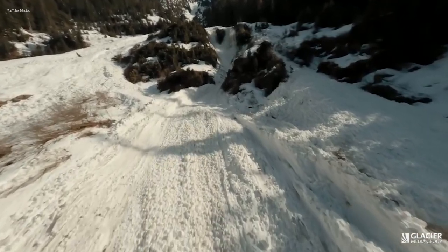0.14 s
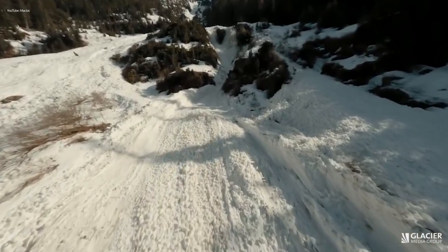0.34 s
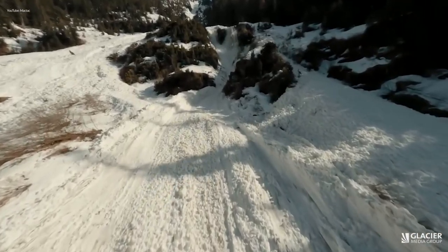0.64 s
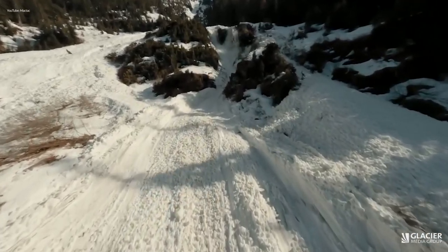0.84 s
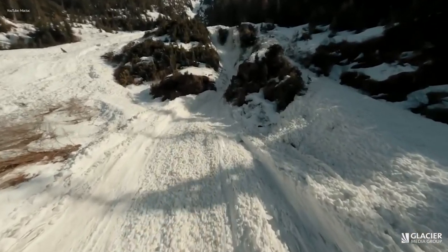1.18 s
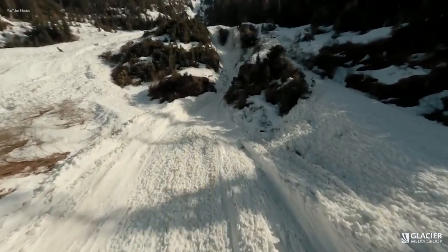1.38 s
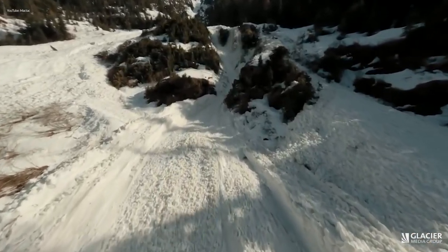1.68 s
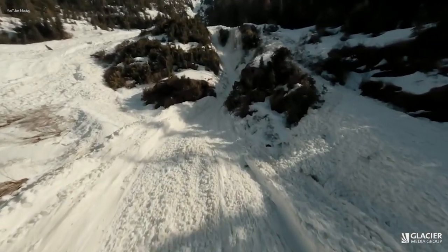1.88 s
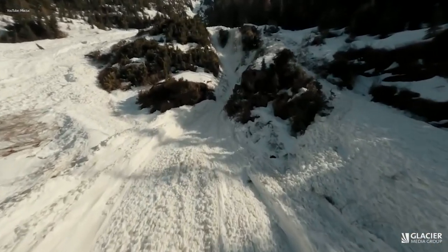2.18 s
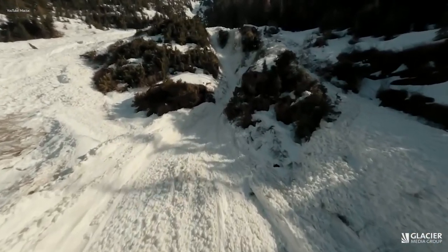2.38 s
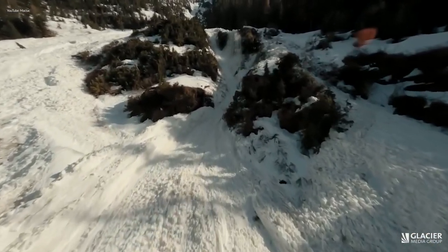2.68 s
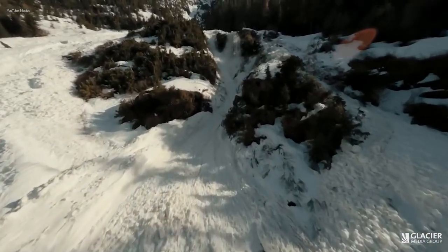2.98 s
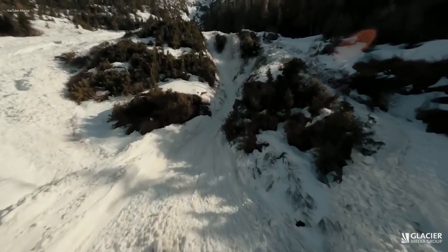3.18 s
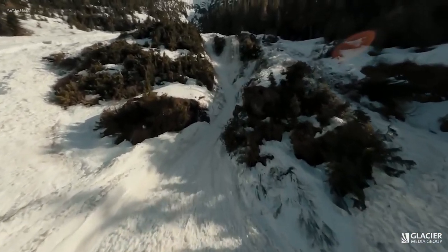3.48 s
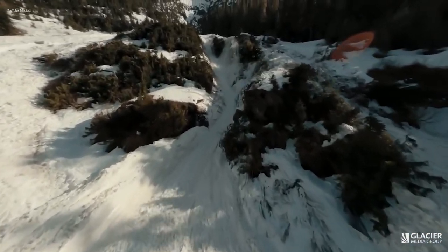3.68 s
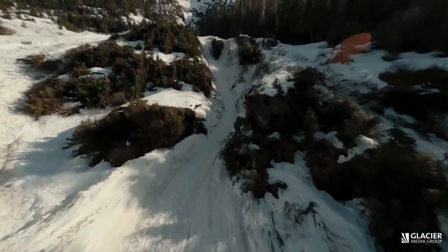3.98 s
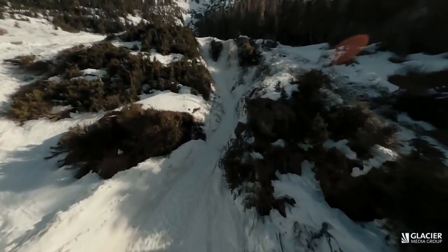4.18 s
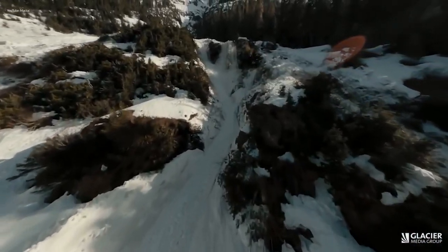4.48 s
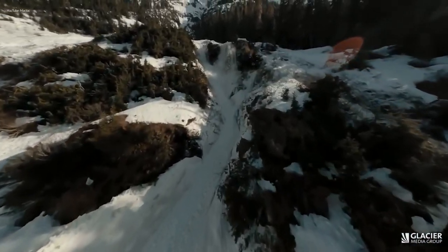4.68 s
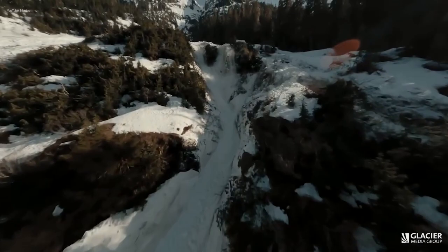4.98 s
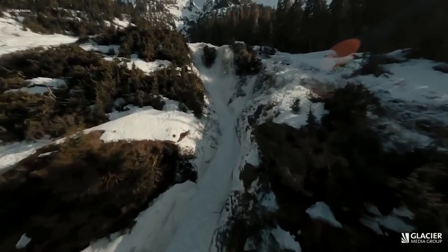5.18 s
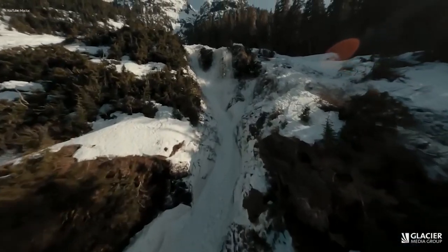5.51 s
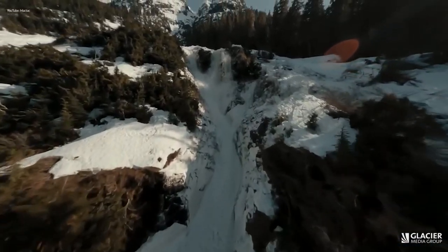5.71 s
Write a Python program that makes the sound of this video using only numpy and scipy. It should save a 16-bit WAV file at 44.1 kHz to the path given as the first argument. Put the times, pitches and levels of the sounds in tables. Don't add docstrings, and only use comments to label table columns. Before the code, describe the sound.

Heavy sub-bass roar of sliding snow heaves and throbs close by, lumps crackling within it, thinning and widening toward the end.

```python
import sys
import numpy as np
from scipy import signal
from scipy.fft import rfft, irfft
from scipy.io import wavfile
from scipy.ndimage import uniform_filter1d, minimum_filter1d

SR = 44100
rng = np.random.default_rng(int(sys.argv[2]) if len(sys.argv) > 2 else 0)


def materialize(psi):
    bounded = np.clip(np.atleast_2d(psi).T, -1, 1)
    quanta = np.round(bounded * 32767).astype(np.int16)
    wavfile.write(sys.argv[1], SR, quanta)


def decibels_to_gain(level_db):
    exponent = np.asarray(level_db, float) / 20
    return 10 ** exponent


N = 257984


def evened(x):
    return x / np.sqrt(np.mean(x ** 2) + 1e-20)


def curves(rows):
    s, *columns = np.transpose(rows)
    return [np.interp(np.arange(N) / SR, s, c) for c in columns]


def read(points, hz):
    f, value = np.transpose(points)
    return np.interp(np.log(hz + 1), np.log(f + 1), value, right=value[-1])


def colour(x, points):
    hz = np.fft.rfftfreq(x.shape[-1], 1 / SR)
    inside = (hz > points[0][0]) & (hz < points[-1][0])
    return irfft(rfft(x) * decibels_to_gain(read(points, hz)) * inside, x.shape[-1])


def lean(db):
    pair = np.array([decibels_to_gain(db / 2), decibels_to_gain(-db / 2)])
    return pair / pair.mean(0)


def drift(seconds):
    size = max(int(seconds * SR), 2)
    return evened(uniform_filter1d(uniform_filter1d(rng.standard_normal(N), size), size))


def patches(shape, bins, frames):
    across = uniform_filter1d(rng.standard_normal(shape), int(bins), 0)
    return evened(uniform_filter1d(across, int(frames), 1))


def swells(rows):
    middle, length = np.transpose(rows)[:2, :, None]
    t = np.arange(0, N + 64, 64) / SR
    return np.cos(np.pi * np.clip((t - middle) / length, -.5, .5)) ** 2


def summed(heights, shapes):
    return np.interp(np.arange(N) / 64, np.arange(shapes.shape[1]), heights @ shapes)


def steadied(x, seconds, share):
    power = uniform_filter1d((x ** 2).mean(0), int(seconds * SR))
    return x / (abs(power) + 1e-9) ** (np.clip(share, 0, 1) / 2)


def grains(per_s, spread_db, hz_low, hz_high, cycles, count):
    size = decibels_to_gain(spread_db * np.minimum(rng.exponential(1, N), 5)) * rng.choice([-1, 1], N)
    size = size * (rng.random(N) < per_s / SR)
    kind = rng.integers(0, count, N)
    t = np.arange(600) / SR
    out = np.zeros(N)
    for k, hz in enumerate(np.geomspace(hz_low, hz_high, count)):
        ring = np.sin(2 * np.pi * hz * t) * np.exp(-hz * t / cycles) * hz
        out += signal.oaconvolve(size * (kind == k), ring)[:N]
    return evened(out)


# time_s, weight_db, front_side_db
MASS_WEIGHT = [
    (0, -1.5, 4.5),
    (.7, -0.5, 1.5),
    (1.2, -0.5, -3),
    (2.0, 0.5, 0),
    (2.6, -1.5, -2),
    (3.4, -0.5, -2),
    (4.2, -1.5, -1.5),
    (4.8, -4.5, 1),
    (5.3, -5.5, 4.5),
    (5.85, -7.5, 10.5),
]
# centre_hz, level_db, weight_share
GROUND_DEPTHS = [
    (15.7, -20, 1.35),
    (52, -18.5, 1.08),
    (136, -27.5, 0.97),
]
# middle_s, length_s, change_db, depth_hz
MASS_HEAVES = [(0.112, 0.093, 8.5, 76), (0.16, 0.41, 8, 14), (0.271, 0.099, -14, 9.1),
               (0.47, 0.13, -12.5, 14), (0.704, 0.63, 12, 29.4), (1.204, 0.22, -6.5, 36),
               (1.319, 0.053, 7, 15), (1.455, .14, 8, 34), (1.774, 0.28, 6.5, 28), (1.882, 0.026, 18.5, 15),
               (1.925, 0.16, -9.5, 30), (2.065, 0.14, -31, 22.4), (2.163, 0.036, 2.5, 110),
               (2.354, 0.084, 28, 26.4), (2.475, 0.43, -6.5, 34), (2.693, 0.11, -4.5, 9.5),
               (2.942, .1, -3.5, 7.7), (3.472, 0.36, 7, 17), (3.556, 0.1, -34, 35), (3.719, 0.053, 13, 13),
               (3.772, 0.28, -8.5, 28), (4.092, 0.23, -12, 49), (4.204, 0.17, -0.5, 27),
               (4.31, 0.11, -14.5, 7.5), (4.498, 0.1, 2, 15), (4.7, 0.3, 10, 14), (5.061, 0.93, 8.5, 12.8),
               (5.231, 0.13, -40.5, 20), (5.577, 0.26, 19, 29.2), (0.275, 0.34, 6.5, 103),
               (0.126, 0.23, -1, 170), (0.604, 0.3, -2.5, 140), (1.04, 0.072, 3, 120),
               (1.318, 0.16, 1.5, 140), (1.543, 0.13, -2.5, 73), (1.707, 0.34, 1.5, 170),
               (1.848, 0.19, -4, 170), (2.044, 0.28, 0.5, 160), (2.405, 0.11, -11, 190),
               (2.552, 0.16, 4.5, 170), (2.873, 0.47, 3.5, 110), (3.3, 0.28, 0.5, 180),
               (3.676, 0.1, 3, 170), (3.986, .2, 0.5, 160), (4.24, 0.15, 3.5, 100),
               (4.378, 0.065, -10, 280), (4.585, 0.11, -2.5, 190), (4.752, 0.13, 4, 150),
               (5.246, 0.28, 2.5, 120), (5.703, 0.16, -4.5, 160)]


def depths_db():
    weight_db = curves(MASS_WEIGHT)[0]
    shapes = swells(MASS_HEAVES)
    _, _, heave_db, heave_hz = np.transpose(MASS_HEAVES)
    reach_octaves = 0.99
    levels = []
    for centre_hz, level_db, share in GROUND_DEPTHS:
        near = np.exp(-(np.log2(heave_hz / centre_hz) / reach_octaves) ** 2)
        wander_db = 1.27 * drift(0.045)
        levels.append(level_db + share * weight_db + wander_db + summed(heave_db * near, shapes))
    return levels


# pitch_hz, level_db
SHAKE_SPECTRUM = [(4, -19.5), (9, 3), (14, -8), (22, -6.5), (28, -9.5), (36, -19.5)]
RUMBLE_SPECTRUM = [(27, -25.5), (34, 0.5), (40, -2), (47, -5), (56, -3.5), (75, -6.5), (100, -11.5),
                   (130, -27.5), (170, -33)]
TUMBLE_SPECTRUM = [(80, -7.5), (110, -0.5), (140, -3), (190, -7.5), (270, -13.5), (400, -20.5),
                   (600, -28.5), (1000, -36.5)]
# pitch_hz, left_right_correlation (1 = the same)
EAR_LIKENESS = [(10, 1), (28, 0.48), (45, 0.82), (62, 0.16), (85, 1), (140, 0.76), (270, 0.92), (600, 0.59)]


def ground():
    alike = np.clip(read(EAR_LIKENESS, np.fft.rfftfreq(N, 1 / SR)), -1, 1)
    width = decibels_to_gain(curves(MASS_WEIGHT)[1])
    bodies = (SHAKE_SPECTRUM, RUMBLE_SPECTRUM, TUMBLE_SPECTRUM)
    steady_s, steady_share, leans_db = (.16, .1, .12), (.9, .6, .4), (0, .3, -1.3)
    out = np.zeros((2, N))
    for db, body, seconds, share, lean_db in zip(depths_db(), bodies, steady_s, steady_share, leans_db):
        mid, side = rfft(rng.standard_normal((2, N)))
        side = side * np.sqrt((1 - alike) / (1 + alike))
        mid, side = colour(irfft(np.array([mid, side]), N), body)
        pair = steadied(np.array([mid + width * side, mid - width * side]), seconds, share)
        out += decibels_to_gain(db) * lean(lean_db)[:, None] * pair / np.std(pair.mean(0))
    return out


# middle_s, length_s, change_db, depth_hz
BLOCK_ROLLS = [(0.373, 0.25, 6.5, 72), (1.252, 0.18, -1, 72), (1.397, 0.2, -5, 72), (2.35, 0.12, 3, 72),
               (2.559, 0.15, 10.5, 72), (2.738, 0.29, 3, 72), (3.14, 0.18, 1.5, 72), (3.26, 0.11, 2, 72),
               (3.354, 0.12, -1, 72), (3.747, .15, 1, 72), (4.145, 0.18, 10, 72), (4.347, 0.092, 1, 72),
               (4.447, 0.35, 2.5, 72), (4.765, 0.18, 6, 72), (4.9, 0.21, 1.5, 72), (5.147, .15, -17, 72),
               (5.554, 0.29, -9, 72), (5.76, 0.13, -4, 72), (0.163, 0.18, 3.5, 105), (0.624, 0.13, 3, 105),
               (1.59, 0.25, -5.5, 105), (1.847, .16, -1, 105), (2.73, 0.46, -7.5, 105),
               (3.434, 0.18, -14, 105), (3.543, 0.25, 3.5, 105), (3.85, 0.16, -4.5, 105),
               (4.24, 0.18, -6, 105), (4.502, .25, -1, 105), (4.644, 0.11, 4, 105), (5.211, 0.23, 8, 105),
               (5.696, 0.36, 6, 105)]


def rolling(x):
    shapes = swells(BLOCK_ROLLS)
    _, _, db, hz = np.transpose(BLOCK_ROLLS)
    out = x
    for deep, low_hz, high_hz in ((True, 60, 86), (False, 86, 130)):
        edges = [(low_hz / 1.12, -12), (low_hz * 1.05, 0), (high_hz / 1.05, 0), (high_hz * 1.12, -12)]
        change = decibels_to_gain(summed(db * ((hz < 86) == deep), shapes))
        out = out + (change - 1) * colour(x, edges)
    return out


# time_s, low_hz, high_hz
GULLY_MODES = [
    (0.0, 43.31, 49.7),
    (0.73, 42.87, 48.43),
    (1.46, 43.73, 48.56),
    (2.19, 43.17, 49.1),
    (2.92, 43.72, 48.35),
    (3.66, 42.46, 49.84),
    (4.39, 44.13, 47.05),
    (5.12, 43.61, 50.63),
    (5.85, 44.6, 47.56),
]
# middle_s, length_s
HUM_DROPOUT = [
    (1.31, 0.32),
]


def gully():
    late_s = np.maximum(np.arange(N) / SR - 4.1, 0)
    gap_db = summed(np.array([-12]), swells(HUM_DROPOUT))
    tones = []
    settings = ((-17.5, -8.5, 1.25), (-28, -8, 2.23))
    for hz, (level_db, fade, phase) in zip(curves(GULLY_MODES), settings):
        db = level_db + fade * late_s + 0.37 * drift(0.051) + gap_db
        tones.append(decibels_to_gain(db) * np.sin(2 * np.pi * np.cumsum(hz) / SR + phase))
    low, high = tones
    return np.sqrt(2) * np.array([1.0 * low + 2.08 * high, -.92 * low - 0.14 * high])


# time_s, level_db, lean_left_right_db, brightness_db_per_octave
FLOW_COURSE = [(0, -56, -14, -3.5), (.07, -51, -10, -5), (.18, -42, 1.5, -4), (.55, -45.5, -4, 0),
               (.91, -46, 3.5, -6), (.94, -43.5, -3, 2), (1.42, -36, 6.5, 0.5), (1.69, -38, 1, 4),
               (1.86, -40, 3.5, 2.5), (2.16, -45, 2, 0), (2.2, -46.5, -2, 0.5), (2.43, -43.5, -3.5, 0.5),
               (2.58, -40.5, 1, 5), (3.3, -37, 2, 0.5), (3.9, -37, 8.5, 0.5), (4.22, -37.5, 0, 2),
               (4.7, -41.5, 5.5, -2), (5.85, -41.5, 3.5, -0.5)]
# middle_s, length_s, change_db, added_brightness_db_per_octave
FLOW_WAVES = [(0.287, 0.19, 5.5, 4.5), (0.482, 0.077, 9, -1.5), (0.698, 0.17, 9, 1.5),
              (0.8, 0.051, -3.5, -1.5), (0.859, 0.12, 5.5, 5.5), (0.99, 0.25, 3.5, 1.5),
              (1.122, 0.041, 6.5, -7.5), (1.16, 0.087, -3.5, -4.5), (1.962, 0.13, 2, -4.5),
              (2.122, 0.17, 3.5, 5), (2.278, 0.04, -6.5, 6.5), (2.315, 0.027, 7.5, 0),
              (2.406, 0.047, -11.5, 7.5), (2.481, 0.047, 9.5, 0.5), (2.532, 0.056, 2, -7.5),
              (3.083, 0.057, -4.5, -3), (3.123, 0.042, 2, -3.5), (3.159, 0.069, -4.5, 1.5),
              (3.59, 0.53, -1.5, -1), (3.806, 0.069, 0.5, -1), (4.134, 0.21, 1.5, 1.5),
              (4.3, 0.15, -1, -1.5), (4.419, 0.16, 2.5, -3), (4.989, 0.093, 2.5, -1), (5.217, 0.21, 3.5, 4),
              (5.392, 0.21, 3.5, -1.5), (5.788, 0.17, 2.5, -0.5)]


def flow():
    db, lean_db, bright_db = curves(FLOW_COURSE)
    shapes = swells(FLOW_WAVES)
    _, _, wave_db, wave_bright_db = np.transpose(FLOW_WAVES)
    bright_db = bright_db + summed(wave_bright_db, shapes) + 1.24 * drift(0.069)
    return db + summed(wave_db, shapes), lean_db + 2.5 * drift(0.014), bright_db


# pitch_hz, level_db
CRUNCH_SPECTRUM = [(260, -15), (450, 0), (700, -1), (1030, -0.5), (1640, -2.5), (2240, -4.5), (2840, -11),
                   (3450, -19.5), (4100, -25), (5500, -43.5)]
# pitch_hz, lean_left_right_db
CRUNCH_LEAN = [(400, -10), (900, -1.8), (2200, 0.5), (3500, 1)]


def stream():
    db, lean_db, bright_db = flow()
    common, left, right = (grains(3000, 1.47, 456, 3295, 1.92, count=16) + 1.4 * rng.standard_normal(N)
                           for _ in range(3))
    pair = colour(np.array([common + 0.48 * left, common + 0.2 * right]), CRUNCH_SPECTRUM)
    hz, t, z = signal.stft(pair * decibels_to_gain(1.53 * drift(0.0048)), SR, nperseg=512)
    octaves = np.clip(np.log2((hz + 1) / 1200), -1.5, .95)[:, None]
    tilt_db = octaves * bright_db[np.minimum(t * SR, N - 1).astype(int)]
    field_db = tilt_db + 0.47 * patches(z.shape[1:], 4.2, 4.7)
    z = z * decibels_to_gain(field_db) * lean(read(CRUNCH_LEAN, hz))[:, :, None]
    crunch = decibels_to_gain(db - 0.16 + jams()) * evened(signal.istft(z, SR, nperseg=512)[1][:, :N])
    return lean(lean_db) * (crunch + lumps() + scrapes())


# start_s, peak_db, pitch_hz, t60_s
LUMP_BURSTS = [(0.187, -21.5, 1080, 0.039), (0.256, -19, 875, 0.076), (0.286, -23, 1520, 0.076),
               (0.393, -6.5, 965, 0.014), (0.479, -29, 970, 0.04), (0.71, -19.5, 920, 0.051),
               (0.85, -19, 883, 0.075), (0.924, -23.5, 770, 0.2), (0.975, -19, 810, 0.055),
               (1.113, -16, 1030, 0.071), (1.648, -21.5, 1510, 0.1), (1.709, -15.5, 1120, 0.034),
               (1.791, -15, 810, 0.044), (1.924, -22, 910, 0.076), (2.126, -20, 1140, 0.058),
               (2.363, -27, 865, 0.049), (2.423, -26.5, 1160, 0.034), (2.475, -16, 1190, 0.062),
               (2.861, -26, 1020, 0.037), (2.999, -19, 970, 0.081), (3.102, -12, 1260, 0.054),
               (3.124, -15.5, 1120, 0.06), (3.302, -18, 1060, 0.093), (3.389, -18, 1000, 0.05),
               (3.451, -16.5, 1530, 0.029), (3.594, -22.5, 1250, 0.081), (3.757, -24.5, 1890, 0.16),
               (3.914, -20, 1250, 0.033), (4.745, -23, 1220, 0.054), (5.374, -26.5, 1230, 0.15),
               (0.463, -27, 1800, .04), (0.593, -22.5, 1010, .04), (0.684, -21, 1300, .04),
               (0.797, -27, 900, .03), (0.952, -22, 1890, 0.059), (1.163, -16.5, 900, 0.035),
               (1.193, -22, 900, 0.049), (1.428, -16, 1700, .04), (1.683, -17.5, 1510, 0.041),
               (2.067, -23, 1000, 0.067), (2.577, -20.5, 1300, 0.13), (2.677, -17, 1520, .03),
               (2.788, -16.5, 1200, 0.036), (3.194, -17.5, 920, .05), (3.482, -20.5, 1210, 0.087),
               (3.512, -22, 1520, 0.05), (4.024, -19, 1310, 0.045), (4.401, -23.5, 2010, 0.032),
               (4.974, -23, 988, 0.056), (5.151, -21, 900, 0.048)]


def lumps():
    out = np.zeros(N + 6000)
    t = np.arange(6000) / SR
    body = [(300, -4.5), (800, -13.0), (2300, -10.5), (3400, -17.5), (6000, -33.5)]
    chance = rng.random((len(LUMP_BURSTS), 6000))
    odds = 1300 / SR
    for (s, db, hz, t60), draw in zip(LUMP_BURSTS, chance):
        cracks = np.where(draw < odds, 1., 0.) - np.where(draw > 1 - odds, 1., 0.)
        cracks[60] = 1.0
        ring = np.sin(2 * np.pi * hz * t[:300]) * np.exp(-hz * t[:300] / 0.62)
        rattle = evened(colour(np.convolve(cracks, ring)[:6000], body))
        thud = 0.15 * np.sin(2 * np.pi * .3 * hz * t) * np.exp(-t / 0.009)
        decay = decibels_to_gain(db - 8.0 - 60 * t / max(t60, .01))
        out[round(s * SR):][:6000] += (rattle + thud) * decay * np.minimum(t / .0035, 1)
    return out[:N]


def jams():
    jam_s, jam_db = 0.012, -2
    rows = [(s - jam_s / 3, jam_s) for s, *_ in LUMP_BURSTS]
    return summed(np.full(len(LUMP_BURSTS), jam_db), swells(rows))


# start_s, length_s, pitch_hz, level_db
SLAB_SCRAPES = [(0.203, 0.018, 2050, -43), (0.434, 0.081, 1730, -45), (0.955, 0.064, 2480, -47),
                (1.258, 0.55, 2620, -57), (1.61, 0.11, 1650, -63), (2.624, 0.17, 2730, -47),
                (2.835, 0.18, 2180, -44), (3.232, 0.084, 2170, -44), (3.728, 0.079, 1920, -39.5),
                (3.909, 0.036, 1300, -42), (4.084, 0.12, 1950, -42.5), (4.896, 0.082, 2440, -50),
                (5.169, 0.053, 1950, -45), (5.447, 0.042, 2030, -48), (5.754, 0.058, 2150, -52),
                (1.009, 0.075, 2310, -49), (1.206, .04, 3120, -57), (1.438, 0.026, 2400, -42),
                (2.551, 0.041, 1610, -42), (2.613, 0.032, 2000, -42.5), (2.831, 0.018, 2040, -35),
                (3.948, 0.016, 2900, -48), (3.977, 0.066, 2010, -45.5), (4.012, 0.047, 1300, -39),
                (4.205, .045, 1950, -41), (4.324, 0.081, 1880, -45), (4.542, 0.055, 1170, -43)]


def scrapes():
    out = np.zeros(N + SR)
    noise = rng.standard_normal((len(SLAB_SCRAPES), SR // 2))
    for (s, length, hz, db), hiss in zip(SLAB_SCRAPES, noise):
        band = [(hz - 700, -30), (hz - 170, -4), (hz, 0), (hz + 170, -4), (hz + 600, -30)]
        sung = colour(hiss, band)[:int(length * SR)]
        swell = signal.windows.tukey(len(sung), .7)
        out[round(s * SR):][:len(sung)] += decibels_to_gain(db) * evened(sung) * swell
    return out[:N]


# start_s, peak_db, pitch_hz
CLOD_SNAPS = [(0.154, -36, 1197), (0.24, -30, 900), (0.33, -30, 2170), (0.668, -35, 1340),
              (0.749, -34.5, 1980), (1.574, -24.5, 1230), (1.747, -25, 1060), (1.987, -21.5, 1500),
              (2.03, -28, 900), (2.141, -27, 2570), (2.16, -24.5, 2000), (2.248, -30, 1300),
              (2.32, -31, 1600), (2.458, -28, 920), (3.248, -21, 1130), (3.29, -21, 1220),
              (3.66, -23, 1090), (4.145, -35, 1630), (4.418, -32, 1290), (4.502, -31, 985),
              (4.593, -30, 1530), (4.832, -29, 1500), (5.019, -33, 900), (5.188, -36, 900),
              (5.25, -19.5, 970), (5.363, -39, 1020), (5.765, -34, 1090)]


def clods():
    rise_s, t60_s = 0.001, 0.024
    out = np.zeros(N + 2048)
    t = np.arange(2048) / SR
    for (s, db, hz), puff in zip(CLOD_SNAPS, rng.standard_normal((len(CLOD_SNAPS), 2048))):
        band = [(hz / 3, -18), (hz / 1.3, -3), (hz * 1.6, -2), (hz * 1.53, -12), (hz * 3, -26)]
        snap = evened(colour(puff, band))
        out[round(s * SR):][:2048] += snap * decibels_to_gain(db - 4.5 - 60 * t / t60_s) * np.minimum(t / rise_s, 1)
    return lean(1.5)[:, None] * colour(out[:N], [(250, 1.5), (2900, -3), (4200, -13.5), (6000, -39)])


# time_s, level_db, lean_left_right_db
SPRAY_COURSE = [(0, -61, 9), (.01, -69, -23), (.3, -65.5, -29), (1.42, -72, -14), (2.1, -64, -7.5),
                (2.25, -71.5, -37), (2.6, -66.5, -10.5), (4.4, -62, -19), (4.9, -64, -11),
                (5.25, -60, -4.5), (5.85, -59.5, -2)]
# middle_s, length_s, change_db
SPRAY_GUSTS = [(0.082, 0.18, 5), (0.154, 0.13, -1.5), (0.293, 0.18, 2.5), (1.13, 0.2, 4),
               (1.45, 0.084, -2.5), (1.846, 0.088, -4), (2.203, 0.11, -6), (2.338, 0.09, 5.5),
               (2.728, 0.06, 6), (3.135, .08, -1), (3.456, 0.13, 5), (3.736, 0.22, 3.5),
               (4.036, 0.45, -2.5), (4.437, 0.067, 4), (4.61, .08, -0.5), (5.046, 0.11, 6),
               (5.26, 0.085, 2.5)]
# middle_s, length_s, added_lean_left_right_db
SPRAY_CROSSINGS = [
    (4.31, .05, 9),
    (4.36, .06, -10),
    (4.44, .1, 9),
    (4.87, 0.13, -5),
    (4.922, .05, 6),
    (5.07, .11, 8),
]
# pitch_hz, level_db
ICE_SPECTRUM = [(1600, -0.5), (3000, 5), (4600, 2.5), (6500, 1), (8300, -2), (10000, -5.5), (12500, -12.5),
                (15000, -20), (16500, -30)]


def spray():
    db, lean_db = curves(SPRAY_COURSE)
    db = db + summed(np.transpose(SPRAY_GUSTS)[2], swells(SPRAY_GUSTS))
    lean_db = lean_db + 0.5 * (flow()[0] + 34)
    lean_db = lean_db + summed(np.transpose(SPRAY_CROSSINGS)[2], swells(SPRAY_CROSSINGS))
    fizz = [grains(900, 4.6, 3000, 15000, 0.77, count=12) + 1.8 * rng.standard_normal(N)
            for _ in range(2)]
    flutter_db = [1.5 * drift(0.1) + 1.0 * drift(0.005) for _ in range(2)]
    fizz = colour(np.array(fizz), ICE_SPECTRUM) * decibels_to_gain(flutter_db)
    _, _, z = signal.stft(fizz, SR, nperseg=256)
    z = z * decibels_to_gain([1.5 * patches(z.shape[1:], 13, 9.3) for _ in range(2)])
    fizz = np.array([evened(one) for one in signal.istft(z, SR, nperseg=256)[1][:, :N]])
    return decibels_to_gain(db + 4.5) * lean(lean_db) * fizz + chips()


# start_s, peak_db, pitch_hz, lean_left_right_db
ICE_CHIPS = [(0.2614, -44.5, 4800, -6.5), (0.348, -42, 4870, -17), (0.5498, -38, 4650, -33),
             (1.4775, -43, 4870, 7), (1.715, -42, 5060, -20), (1.916, -52, 4760, -2),
             (2.095, -51, 6040, -9), (3.1, -40, 4680, -4.5), (3.126, -33, 4670, 3.5),
             (3.3126, -44, 5180, -11), (3.709, -45.5, 4820, -14), (3.816, -63, 4970, -18),
             (4.3652, -35.5, 5540, -33), (4.4706, -41.5, 6170, -19), (4.9207, -51, 4680, -4),
             (4.928, -52, 4900, -17), (5.042, -40, 4680, -15), (5.146, -48, 4740, -1),
             (5.224, -38.5, 6980, -21), (5.256, -40, 5100, 3.5), (5.683, -55, 5260, 0),
             (3.39, -51, 4980, -9), (4.403, -47.5, 6400, 5), (0.487, -47.5, 4980, 8),
             (0.1466, -54, 4860, -21), (0.5741, -48, 5030, -22), (0.684, -52, 5030, -11),
             (0.7634, -45, 4950, -24), (0.8253, -51, 6590, -11.5), (1.3409, -51, 5060, -11.5),
             (1.7883, -46.5, 5000, -10), (2.4177, -50.5, 4940, -24), (2.4785, -51, 5000, -3)]


def chips():
    ticks = np.zeros((2, N + 900))
    t = np.arange(900) / SR
    envelope = np.exp(-t / 0.00057) * np.minimum(t / 0.0014, 1)
    for (s, peak_db, hz, side_db), puff in zip(ICE_CHIPS, rng.standard_normal((len(ICE_CHIPS), 900))):
        rough = uniform_filter1d(uniform_filter1d(puff, 6), 6) * 4.1 + .3 * puff
        chip = rough * np.sin(2 * np.pi * hz * t) * envelope
        ticks[:, round(s * SR):][:, :900] += lean(side_db)[:, None] * decibels_to_gain(peak_db) * chip
    return ticks[:, :N]


def distant_slide():
    far = colour(rng.standard_normal((2, N)), [(300, 14.5), (1000, -2.5), (2200, -10.5), (3200, -26.0)])
    return decibels_to_gain(-49.5) * evened(far + 1.1 * far[::-1])


def scene():
    return rolling(ground()) + gully() + stream() + clods() + spray() + distant_slide()


def band_limit(x):
    return signal.sosfilt(signal.butter(12, 15720, fs=SR, output="sos"), x)


def record(dry):
    hold_db, hold_share, size = -7, .45, int(.014 * SR)
    ceiling, knee = .572, 13
    peak_db = 20 * np.log10(-minimum_filter1d(-abs(dry), size) + 1e-9)
    dry = dry / decibels_to_gain(uniform_filter1d(hold_share * np.maximum(peak_db - hold_db, 0), size))
    held = dry / (1 + abs(dry / ceiling) ** knee) ** (1 / knee)
    return band_limit(held)


dry = scene()
out = record(dry)
materialize(out)
```